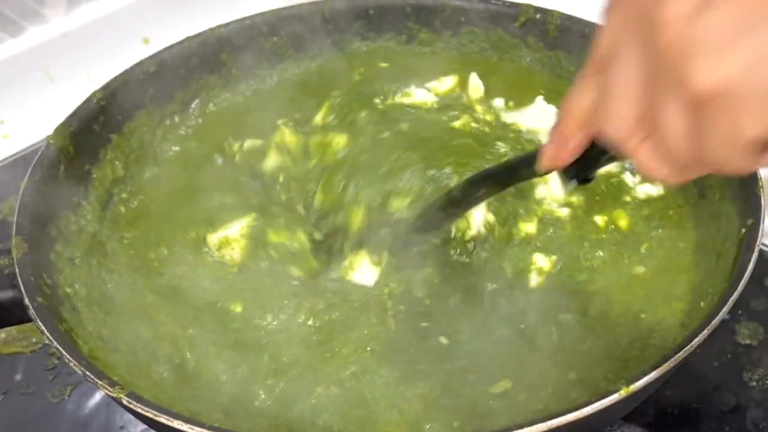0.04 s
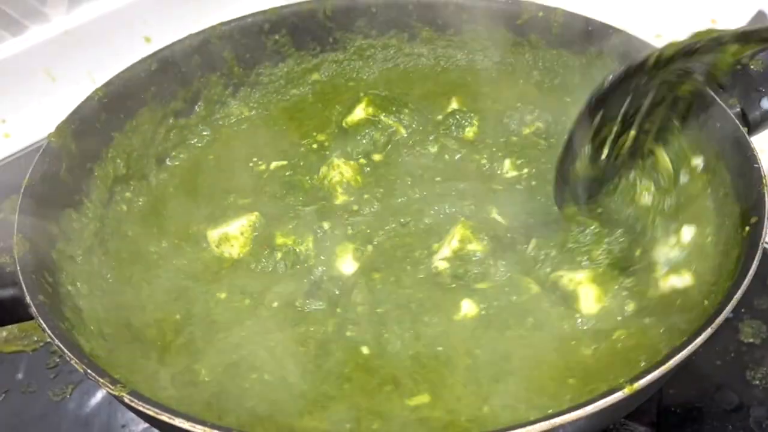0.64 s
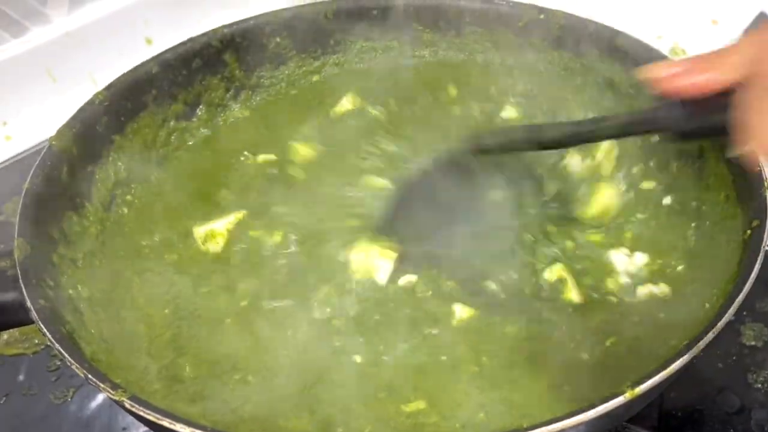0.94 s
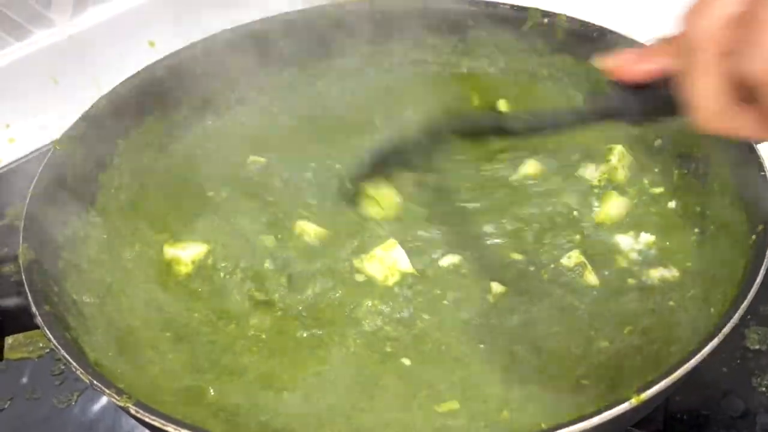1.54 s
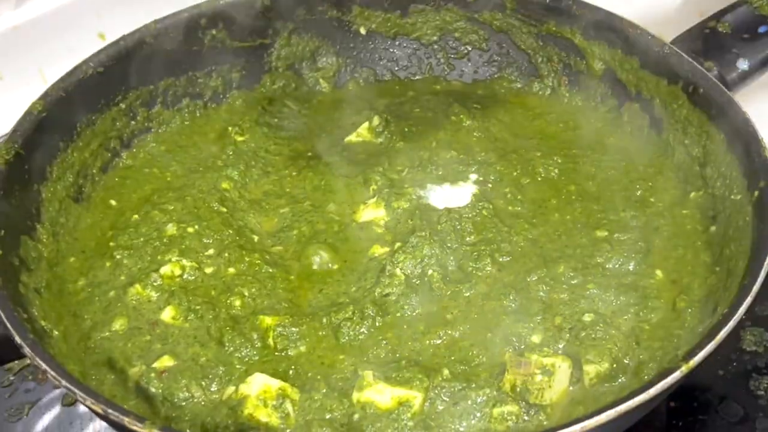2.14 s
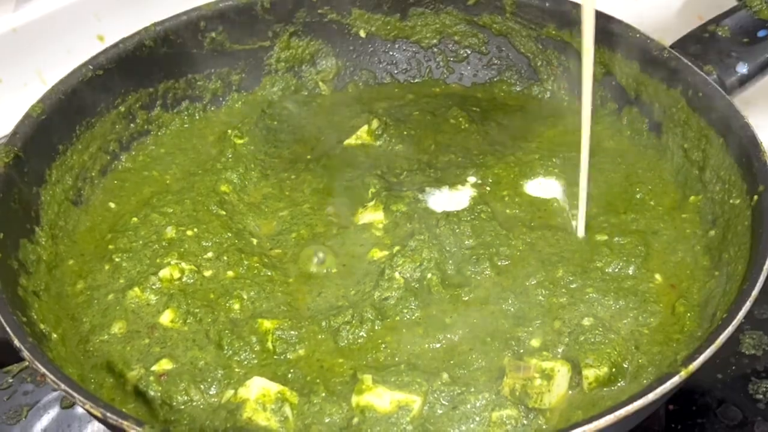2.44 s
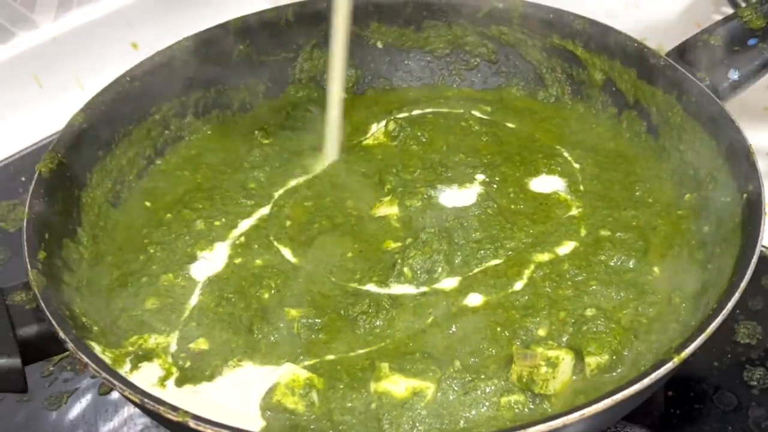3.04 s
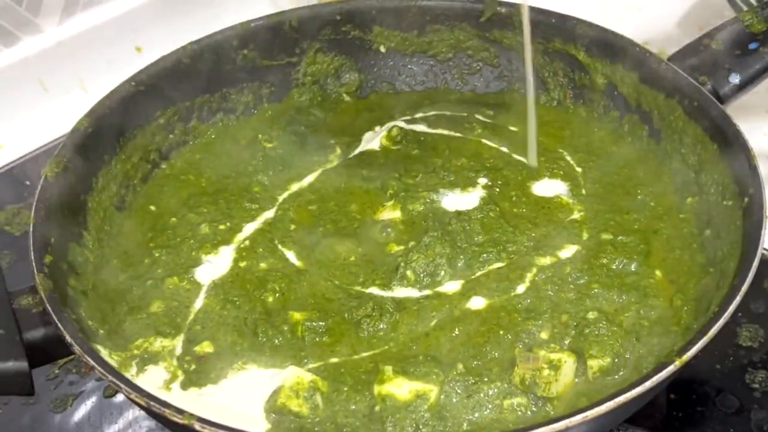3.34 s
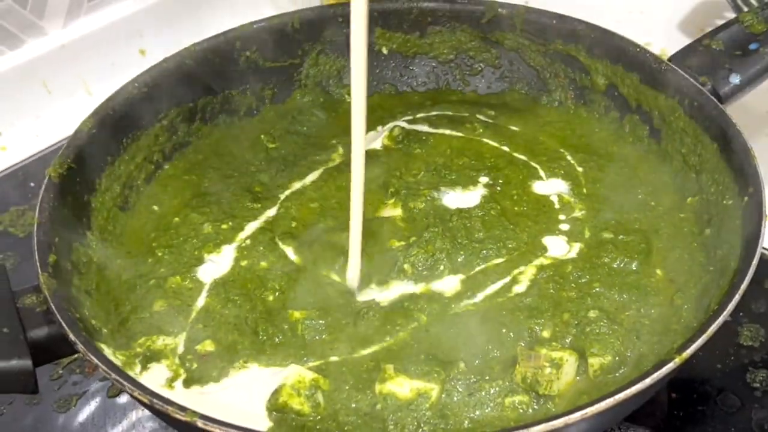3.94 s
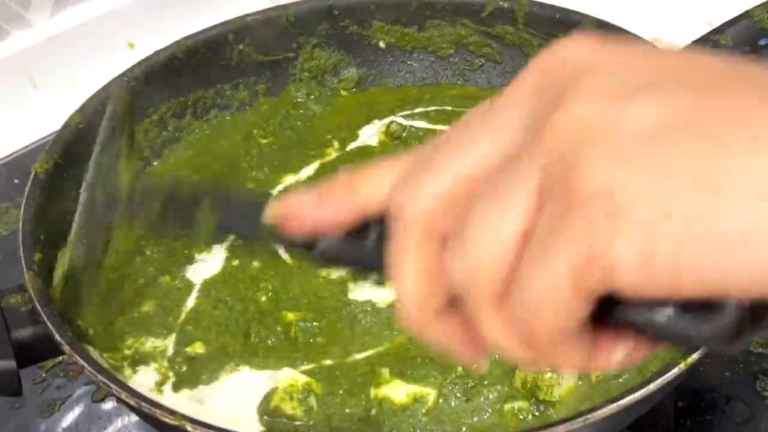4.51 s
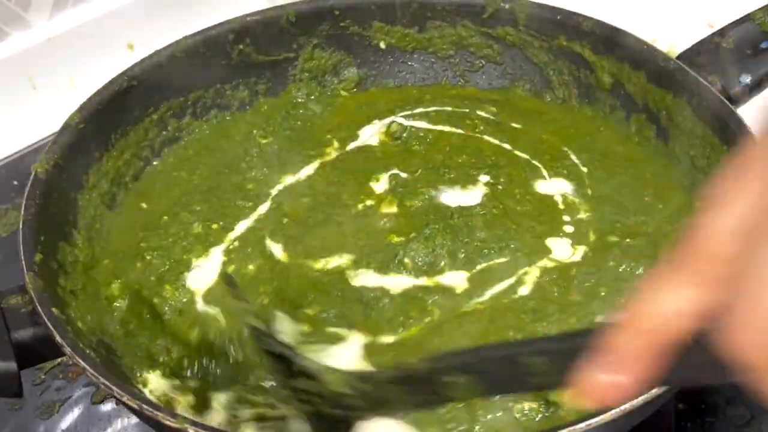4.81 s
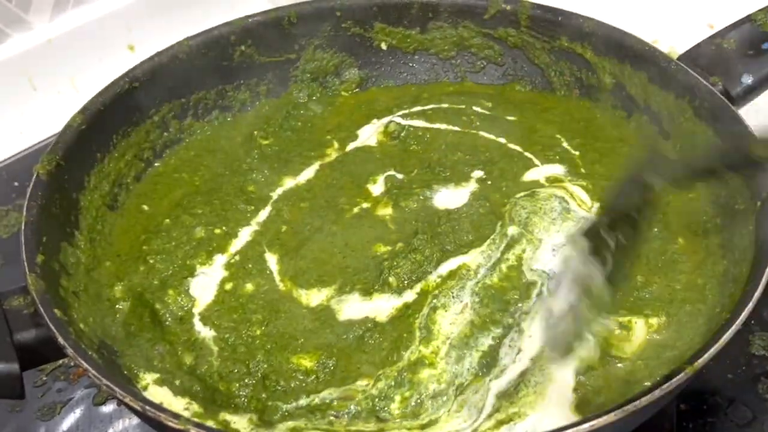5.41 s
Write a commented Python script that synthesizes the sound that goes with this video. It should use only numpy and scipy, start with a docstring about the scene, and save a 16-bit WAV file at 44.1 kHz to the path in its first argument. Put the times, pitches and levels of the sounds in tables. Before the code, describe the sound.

Thick sauce simmers in a frying pan, heard close in stereo in a small kitchen with a short echo and a faint, steady stove and fan hum. For the first 1.4 seconds a plastic spatula stirs, making soft squelches, low glugs and several clacks on the pan, the sharpest at about 1.1 seconds. At 1.7 seconds a light, sputtering sizzle starts abruptly, swells briefly and settles. From there, steam bubbles plop irregularly a few times a second, the sauce sometimes glugging shut, while drops spit with bright ticks on the hot rim, strongest around 2.3, 2.7, 3.2 and 3.9 seconds. From about 4.3 to 4.9 seconds the spatula scrapes wetly round the pan, knocking twice and giving one faint, short, falling squeak near 4.7 seconds. Plops, spits and sizzle continue to the end at about 5.5 seconds.

```python
"""A small, hard-walled kitchen, the stereo microphone close to a frying pan of thick, simmering sauce.
Steam bubbles plop, the sauce glugs shut over them, and drops spit and sizzle on the hot rim.
A plastic spatula clacks and stirs, rests while cream is poured in silently, then scrapes round the pan
again and squeaks once. Stove and fan hum underneath, and the tiles give a short echo."""
import sys
import numpy as np
from scipy import signal
from scipy.fft import rfft, irfft, next_fast_len
from scipy.io import wavfile
from scipy.ndimage import map_coordinates

SR = 44100
rng = np.random.default_rng(int(sys.argv[2]) if len(sys.argv) > 2 else 0)


def wrap_up_sound(samples):
    """Save the sound to the file named by the first command line argument, as 16-bit audio."""
    columns = np.atleast_2d(samples).T
    # keep every value between -1 and 1, then stretch to whole-number steps
    tamed = np.clip(columns, -1, 1)
    steps = np.round(tamed * 32767).astype(np.int16)
    wavfile.write(sys.argv[1], SR, steps)


N = 245407
TIME = np.arange(N) / SR
AGE = np.arange(SR // 5) / SR  # seconds since one short sound began
SIZZLE_START_S = 1.68  # a sizzle switches in abruptly and the seething gets louder


def amp(db):
    """Decibels to gain."""
    return 10 ** (np.asarray(db) / 20)


def unit(x):
    """Scale to rms 1."""
    return x / np.sqrt(np.mean(x ** 2) + 1e-20)


def along(points, hz):
    """Read (Hz, value) points on a log axis."""
    freqs, values = np.transpose(points)
    return np.interp(np.log(hz + 1), np.log(freqs + 1), values)


def after(start, ramp_s=0.0029):
    """A gate that opens at start seconds."""
    return np.clip((TIME - start) / ramp_s, 0, 1)


def wobble(rate):
    """A smooth random curve, rate knots a second."""
    return map_coordinates(rng.standard_normal(int(N * rate / SR) + 4), [TIME * rate])


def add(track, start, sound):
    """Mix a sound in at start seconds."""
    part = track[..., max(round(start * SR), 0):][..., :sound.shape[-1]]
    part += sound[..., :part.shape[-1]]


def filtered(x, response):
    """Filter x by a complex response of frequency."""
    n = x.shape[-1]
    size = next_fast_len(n + 8192, True)
    return irfft(rfft(x, size) * response(np.fft.rfftfreq(size, 1 / SR)), size)[..., :n]


def colour(points, size=2048):
    """Causal impulse response of energy 1 with the given spectral shape."""
    cepstrum = irfft(np.log(amp(along(points, np.fft.rfftfreq(size, 1 / SR)))))
    cepstrum[1:size // 2] *= 2  # fold to minimum phase
    cepstrum[size // 2 + 1:] = 0
    body = irfft(np.exp(rfft(cepstrum)))
    return body / np.linalg.norm(body)


def modes(peaks):
    """Impulse response of energy 1 of a few resonances."""
    body = sum((-1) ** k * amp(db) * width * np.exp(-np.pi * width * AGE) * np.sin(2 * np.pi * hz * AGE)
               for k, (hz, width, db) in enumerate(peaks))
    return body / np.linalg.norm(body)


def burst(body, life_s, scatter):
    """A sharp push and its crumbling aftermath through a body, with the energy of 1 ms at rms 1."""
    crumble = rng.standard_normal(len(AGE)) * np.exp(-AGE / life_s) * np.tanh(AGE / (.25 * life_s))
    force = (AGE == 0) + scatter * crumble / np.linalg.norm(crumble)
    sound = signal.fftconvolve(force, body)[:len(AGE)]
    return sound / np.linalg.norm(sound) * np.sqrt(SR / 1000)


def grains(body, rate, spread_db):
    """Tiny pops of uneven size, about rate a second, through a body; rms 1."""
    size = amp(spread_db * np.minimum(rng.exponential(size=N), 4)) * rng.choice([-1, 1], N)
    pops = size * (rng.random(N) < rate / SR)
    return unit(signal.fftconvolve(pops, body)[:N])


def tone(cycles, flutter, rate=16):
    """A note of rms 1 that follows a running count of cycles, wavering in level and phase."""
    waver = 1 + flutter * (wobble(rate) + 1j * wobble(rate))
    return unit(np.real(waver * np.exp(2j * np.pi * cycles)))


# How alike the room sounds on both sides of the microphone. Each row: frequency in Hz, coherence.
COHERENCE = [(60, .99), (130, .8), (180, .6), (300, .8), (640, .6), (1400, .3), (3000, .45), (6000, .45),
             (8000, .85), (15000, .85)]
def diffuse(pair):
    """Two unrelated signals become left and right, most alike in the bass."""
    def mid_side_gains(hz):
        turn = np.arccos(along(COHERENCE, hz)) / 2
        return np.array([np.cos(turn), np.sin(turn)])
    mid, side = filtered(pair, mid_side_gains)
    return np.array([mid + side, mid - side])


def rush(spectrum):
    """Diffuse stereo noise of rms 1."""
    noise = filtered(rng.standard_normal((2, N)), lambda hz: amp(along(spectrum, hz)))
    return unit(diffuse(noise))


# Fan and stove humming behind the pan. Each row: pitch in Hz, level in dB, flutter from 0 to 1.
STOVE_HUM = [(61, -51, 0.2), (185.1, -62.5, 0.05)]
# Their rush, all round the microphone. Each row: frequency in Hz, relative level in dB.
AIR_SPECTRUM = [(20, -76), (30, -25), (45, -3), (64, -13.5), (100, -3), (140, -12.5), (180, -8.5),
                (230, -17.5), (320, -12.5), (530, -22), (840, -24), (2200, -31), (4500, -38),
                (16000, -55.5)]
def stove(air_db=-53, drone_db=-58, drone_hz=99.6, pour_start_s=1.68, pour_end_s=4.4):
    """Fan and burner hum and rush steadily; a low drone joins them during the pouring."""
    hum = sum(amp(db) * tone(hz * TIME, flutter) for hz, db, flutter in STOVE_HUM)
    pouring = after(pour_start_s) - after(pour_end_s)
    drone = amp(drone_db) * pouring * tone(drone_hz * TIME, flutter=0.94)
    return hum + drone + amp(air_db) * rush(AIR_SPECTRUM)


def bubble(hz, swell_s, rise=0.17):
    """A pocket of steam rings briefly, its pitch rising as the hole opens; thick sauce damps it fast."""
    u = AGE / swell_s
    pitch = hz * (1 + rise * np.tanh(u - 1))
    return (u * np.exp(1 - u)) ** 2 * np.sin(2 * np.pi * np.cumsum(pitch) / SR)


# Big steam bubbles opening close to the microphone. Each row: start in seconds, level in dB,
# pitch at the peak in Hz, swell time in seconds, tearing skin in dB relative to the bubble.
BIG_BUBBLES = [(0.803, -40, 660, 0.0039, 3), (1.767, -43, 710, 0.0028, 2), (2.025, -44, 626, 0.0024, 8),
               (2.24, -38, 610, 0.0034, -2), (2.492, -37, 648, 0.0035, -14), (2.516, -40, 633, 0.0054, -3),
               (2.783, -38.5, 556, 0.0027, -7), (2.918, -36, 598, 0.0037, -10),
               (3.203, -36.5, 600, 0.0035, -19), (3.25, -38.5, 636, 0.003, -13),
               (3.571, -38.5, 560, 0.002, -20), (3.658, -47, 623, 0.0021, -10),
               (4.059, -38, 630, 0.0029, -2), (4.239, -43, 570, 0.0015, -8),
               (4.332, -43.5, 630, 0.0036, 2.5), (4.464, -38, 593, 0.0026, -17),
               (4.595, -41.5, 453, 0.0017, -19), (4.644, -41.5, 360, 0.0026, -24),
               (4.923, -42.5, 530, 0.0025, -11), (4.941, -42.5, 586, 0.0018, -15),
               (5.021, -37.5, 605, 0.0013, -9), (5.189, -38.5, 400, 0.002, -10),
               (5.489, -44, 620, 0.0034, -22)]
# Seething sauce, and its wet squelch, heard close. Each row: frequency in Hz, relative level in dB.
SEETHE_SPECTRUM = [(150, -42.5), (330, -9), (600, -4), (850, -15), (1300, -6), (2500, -24), (5000, -67),
                   (12000, -61)]
SQUELCH_SPECTRUM = [(120, -8), (250, -1.5), (500, 6), (750, -1), (950, -3), (1250, -3), (1480, -1),
                    (1850, -16.5), (6000, -44), (12000, -43)]
def simmer(surge, small_count=70, small_db=-63.5, seethe_db=-67.5, extra_seethe_db=-71):
    """Big plops, each tearing its wet skin, and many small ones over the seething of the sauce."""
    out, wet = np.zeros(N), colour(SQUELCH_SPECTRUM)
    for start, db, hz, swell_s, tear_db in BIG_BUBBLES:
        skin = amp(tear_db) * burst(wet, life_s=0.012, scatter=6.7)
        add(out, start - .001, amp(db) * (bubble(hz, swell_s) + skin))
    for when, pitch, size in rng.random((small_count, 3)):
        plip = bubble(420 * 2 ** (1.3 * pitch), swell_s=0.0022, rise=0.4)
        add(out, when * N / SR, amp(small_db + 3 * size) * plip)
    seethe = grains(colour(SEETHE_SPECTRUM), rate=500, spread_db=4.5)
    return out + (amp(seethe_db) + amp(extra_seethe_db) * surge) * seethe


# Sauce slumping shut in the pan, behind the blade or over a big bubble.
# Each row: start in seconds, level in dB, final pitch in Hz, trim of the wet slap in dB.
SLUMPS = [(0.001, -37.5, 104.5, -1.5), (0.493, -43, 279, 6), (0.883, -45.5, 203, 9), (1.061, -43, 175.5, 8),
          (1.101, -44, 100, 1), (2.783, -44, 198.4, 8.5), (3.191, -49.5, 191, 10), (3.577, -43, 87, -2),
          (4.526, -39, 98.5, 0), (4.8, -41.5, 173.4, 14.5), (4.859, -41, 109, -19), (5.189, -38, 74.5, -5)]
def glugs(pocket_db=-1, first_pitch_ratio=3.596, sink_s=0.00576, swell_s=0.0081):
    """The sauce slaps shut, and the trapped air pocket's pitch sinks as its mouth narrows."""
    out, wet = np.zeros(N), colour(SQUELCH_SPECTRUM)
    envelope = AGE / swell_s * np.exp(1 - AGE / swell_s)
    sink = 1 + (first_pitch_ratio - 1) * np.exp(-AGE / sink_s)
    for start, db, final_hz, slap_db in SLUMPS:
        pocket = amp(pocket_db) * envelope * np.sin(2 * np.pi * np.cumsum(final_hz * sink) / SR)
        slap = amp(slap_db) * burst(wet, life_s=.007, scatter=2.5)
        add(out, start, amp(db) * (pocket + slap))
    return out


# The spatula meeting the pan, close by.
# Each row: start in seconds, level in dB, then trims in dB for the knock and the tick.
BLADE_HITS = [(0.025, -44.5, 8, -0.5), (0.132, -35, -20, -17), (0.1382, -38.5, 1, 6), (0.45, -42, 9, -19),
              (0.4635, -41, 3.5, 4.5), (0.492, -43, 3, 4), (0.801, -44.5, 4, -10), (0.991, -50.5, -10, 7.5),
              (1.0545, -35, 0, -19), (1.0599, -20, -7.5, -14), (1.068, -34, -7, -13),
              (4.508, -36.5, 2, -1.5), (4.8, -45, 15, -20)]
# The pan's ring under the blade. Each row: frequency in Hz, width in Hz, relative level in dB.
PAN_MODES = [(1000, 200, 1), (1900, 300, -12), (2420, 520, -1), (2720, 280, 3.5), (3250, 220, -5)]
# The dull knock, and the tick of the blade's edge. Each row: frequency in Hz, relative level in dB.
KNOCK_SPECTRUM = [(100, -30), (300, -8), (600, 6.5), (1100, -12.5), (1600, 12), (3000, -14), (9000, -110)]
TICK_SPECTRUM = [(1200, -23), (2400, 10.5), (3000, 11.5), (3700, 19.5), (4400, 15), (5300, 8), (6600, -2),
                 (8300, 2.5), (10000, -15.5), (16000, -32)]
def taps(ring_db=-7, knock_db=-6, tick_db=-5):
    """The plastic blade clacks on the pan, which the sauce damps heavily."""
    out, pan = np.zeros(N), modes(PAN_MODES)
    body, edge = colour(KNOCK_SPECTRUM), colour(TICK_SPECTRUM)
    for start, db, knock_trim, tick_trim in BLADE_HITS:
        ring = amp(ring_db) * burst(pan, life_s=.002, scatter=.45)
        knock = amp(knock_db + knock_trim) * burst(body, life_s=0.0015, scatter=0.6)
        tick = amp(tick_db + tick_trim) * burst(edge, life_s=0.00053, scatter=1.0)
        add(out, start + 0.00081, amp(db) * (ring + knock + tick))
    return out


# Drops bursting on hot metal near the microphone.
# Each row: start in seconds, level in dB, then trims in dB for the snap, the ping and the spray.
DROPS = [(0.1386, -38, -23, -8, -27), (0.179, -52, -18, -1, -22), (1.686, -49, 10.5, 11.5, -27),
         (1.705, -42.5, 3.5, -9, -31), (1.716, -42, 4, -12, -29), (1.734, -48, 11, -12, -23),
         (1.741, -55, 7, -12, -23), (1.786, -46.5, 10.5, -16, -1), (1.855, -37, -3, 5, -5.5),
         (1.867, -42, -4, -12, -20), (1.959, -36.5, -11, -12, -24), (1.978, -46, -6, -8, -17),
         (2.006, -35, -4, 1, -17), (2.036, -33, -3, -4, -11), (2.045, -40, -3, -12, -25),
         (2.231, -44.5, 3, 7.5, -8.5), (2.297, -40, -23, -1, -27), (2.313, -17.5, -14.5, 0, -26.5),
         (2.446, -45, -15, 3.5, -23), (2.486, -27, -2, -4, -14), (2.6371, -28, -23, -9, -21),
         (2.6675, -22, -15.5, -23, -15.5), (2.813, -54, 12.5, -15, -18), (2.957, -43.5, -2, -10, -12.5),
         (3.117, -35.5, -5, -16, -4.5), (3.1898, -18, -3, -20, -28), (3.2529, -31.5, -6, -20, -13.5),
         (3.329, -45, -6, -12, -10), (3.413, -35, -17, -13, -9.5), (3.553, -45.5, -0.5, 2, -10),
         (3.8335, -29, -36, -14, -42), (3.8603, -27, -25, -9, -19), (3.862, -21, -23, -5.5, -30),
         (3.886, -38, 3, -17, -22), (4.102, -32, -10, -4, -17), (4.1409, -27, -11, -8, -40),
         (4.2865, -44.5, -12, -6, -3), (4.3513, -41, -16, -8, -8.5), (4.458, -33.5, -27, -7, -18),
         (4.79, -33, -10, -3, -25), (4.938, -30.5, -3.5, 0, -16), (5.04, -45.5, -20, 8.5, -6),
         (5.467, -42.5, -6, -14, -2)]
# A drop's bright crack, lower snap and frying spray. Each row: frequency in Hz, relative level in dB.
CRACK_SPECTRUM = [(1500, -30), (4500, 4), (6200, 18.5), (7400, 1), (8600, 16.5), (11000, 21.5), (12500, 8),
                  (14800, 19), (17000, -21)]
SNAP_SPECTRUM = [(150, -35), (450, 14), (1000, 14.5), (1700, 8), (2600, 10.5), (3400, 12), (4300, 5.5),
                 (5200, 3.5), (6200, 7), (9000, -8), (16000, -5)]
FRY_SPECTRUM = [(500, 5.5), (1200, -5), (2500, -10.5), (5000, 0.5), (7000, 0), (8700, 2), (11000, -0.5),
                (13000, -13), (15700, -0.5), (17000, -55)]
def spits(crack_db=-9.5, snap_db=-5, spray_db=7, ping_hz=8300):
    """Each drop cracks open, its tiny cavity rings for a few cycles, then its spray fries away."""
    out = np.zeros(N)
    bright, low, fry = colour(CRACK_SPECTRUM), colour(SNAP_SPECTRUM), colour(FRY_SPECTRUM)
    detunes = 1.04 ** rng.uniform(-1, 1, len(DROPS))
    for (start, db, snap_trim, ping_trim, spray_trim), detune in zip(DROPS, detunes):
        crack = amp(crack_db) * burst(bright, life_s=.0008, scatter=.45)
        snap = amp(snap_db + snap_trim) * burst(low, life_s=.0012, scatter=.7)
        spray = amp(spray_db + spray_trim) * burst(fry, life_s=0.022, scatter=0.6)
        ping = amp(ping_trim) * bubble(ping_hz * detune, swell_s=.0002, rise=.25)
        add(out, start + .0007, amp(db) * (crack + snap + spray))
        add(out, start + .0003, amp(db) * ping)
    return out


# The spatula working round the pan, close by. Each row: start and length in seconds,
# then levels in dB for slosh, squelch, suck and scrape.
STIRS = [(0.446, 0.037, -77, -72, -60, -53.5), (0.818, 0.059, -67, -57, -55.5, -65.5),
         (0.88, 0.13, -57.5, -64, -64, -83), (1.182, 0.24, -56.5, -78, -76, -91),
         (4.339, 0.09, -81, -68, -59, -56), (4.47, 0.16, -63, -70, -70, -63),
         (4.59, .1, -70, -66, -78, -56), (4.624, .115, -81, -71, -60, -51.5),
         (4.69, 0.11, -63, -58, -52.5, -61), (4.795, .11, -54, -58, -60, -64)]
# Thick sauce pushed aside. Each row: frequency in Hz, relative level in dB.
SLOSH_SPECTRUM = [(150, -4), (300, -14.5), (500, -1), (750, -21), (1300, -24), (3000, -32), (12000, -59)]
# Air sucked in behind the blade. Each row: pitch in Hz, swell time in seconds, relative level in dB.
AIR_POCKETS = [(675, 0.0017, -5.5), (1143, 0.0029, -1), (1410, 0.0022, -1)]
# The blade ringing on the pan floor. Each row: frequency in Hz, width in Hz, relative level in dB.
BLADE_MODES = [(1130, 130, 0), (2260, 200, 2.5), (2950, 340, 1), (3450, 380, 0), (6150, 1700, -6)]
def strokes(scrape_trim_db=-1, press_share=0.44, pitch_sag=.08):
    """The blade pushes sauce aside, drags wetly through it and rasps on the pan, sinking in pitch."""
    slosh = grains(colour(SLOSH_SPECTRUM), rate=400, spread_db=3)
    squelch = grains(colour(SQUELCH_SPECTRUM), rate=500, spread_db=3.5)
    suck = unit(sum(amp(db) * grains(bubble(hz, swell_s), rate=110, spread_db=2.5)
                    for hz, swell_s, db in AIR_POCKETS))
    scrape = amp(scrape_trim_db) * grains(modes(BLADE_MODES), rate=420, spread_db=3)
    out, layers = np.zeros(N), np.array([slosh, squelch, suck, scrape])
    for start, length, *levels_db in STIRS:
        progress = np.linspace(0, 1, int(length * SR))
        pressure = np.sin(np.pi / 2 * np.interp(progress, [0, press_share, 1], [0, 1, 0]))
        travel = start * SR + np.cumsum(1 - pitch_sag * (progress - .5))  # slowing lowers the pitch
        add(out, start, pressure * map_coordinates(amp(levels_db) @ layers, [travel]))
    return out


def sizzle_surge(swell_db=9, swell_at_s=1.754, half_width_s=0.13):
    """Gain of the sizzle and extra seething: it switches in abruptly, swells briefly and settles at 1."""
    swell = np.exp(-((TIME - swell_at_s) / half_width_s) ** 2)
    return after(SIZZLE_START_S) * amp(swell_db * swell)


def sizzle(surge, hiss_db=-63, sputter_db=1.6, droplet_db=-52, droplet_count=12):
    """Water steams off the rim: a sputtering hiss, tiny crackles and the odd droplet frying away."""
    droplets, fry = np.zeros(N), colour(FRY_SPECTRUM)
    for when, size in rng.random((droplet_count, 2)):
        start = SIZZLE_START_S + when * (N / SR - SIZZLE_START_S)
        add(droplets, start, amp(droplet_db + 5 * size) * burst(fry, life_s=0.045, scatter=3.3))
    crackle = amp(-9) * grains(fry, rate=90, spread_db=5)
    sputter = amp(sputter_db * wobble(rate=26))
    return droplets + amp(hiss_db) * surge * sputter * (rush(FRY_SPECTRUM) + crackle)


# One squeak from the pan floor: start and length in seconds, level in dB, first and last pitch in Hz.
BLADE_SQUEAK = (4.632, .1, -55.5, 2390, 2190)
def squeak():
    """At its hardest push the blade sticks and slips on the pan floor: a short, rough note that sinks."""
    start, length, db, first_hz, last_hz = BLADE_SQUEAK
    progress = np.clip((TIME - start) / length, 0, 1)
    pitch = first_hz + (last_hz - first_hz) * progress
    envelope = np.sin(np.pi * progress ** .75) ** 2
    return amp(db) * envelope * tone(np.cumsum(pitch) / SR, flutter=.6, rate=190)


# The kitchen's echo at the microphone. Each row: frequency in Hz, seconds to fall by 60 dB.
KITCHEN_DECAY = [(150, 0.035), (700, 0.3), (3000, 0.28), (8000, 0.21), (15000, 0.013)]
def in_kitchen(sources, echo_db, gap_s=0.0028, early_db=9.5, early_s=0.0012):
    """Close sounds and their echo: hob and pan wall answer first, then tiles and walls."""
    send, echo = amp(echo_db) @ np.array(sources), np.zeros((2, N))
    for part in np.array_split(np.arange(N), 12):  # the tail differs from moment to moment
        hz, age, noise = signal.stft(rng.standard_normal((2, SR // 3)), SR, nperseg=256)
        decay = amp(-60 * age / along(KITCHEN_DECAY, hz)[:, None])
        tail = signal.istft(noise * decay, SR, nperseg=256)[1]
        early = amp(early_db) * np.exp(-np.arange(tail.shape[1]) / SR / early_s)
        tail = diffuse(tail * (1 + early))
        tail /= np.linalg.norm(tail[0])
        add(echo, part[0] / SR + gap_s, signal.fftconvolve(send[None, part], tail, axes=1))
    return sum(sources) + echo


# The microphone's balance. Each row: frequency in Hz, left minus right in dB.
MIC_BALANCE = [(60, .9), (130, 2.5), (300, .3), (1200, 2.2), (2400, .7), (4500, 1.8), (8000, -.8),
               (15000, 0)]
def microphone(x, phases):
    """The left and right ports differ in level and phase, by frequency."""
    half = np.array([[.5], [-.5]])
    def response(hz):
        phase = np.interp(hz, *np.transpose(phases))
        return amp(half * along(MIC_BALANCE, hz)) * np.exp(1j * half * phase)
    return filtered(x, response)


# How the pan reaches the microphone, and the spatula, which works from another side.
# Each row: frequency in Hz, phase between the ports in radians.
PAN_PHASES = [(0, 0), (500, .2), (1000, 1.35), (1500, 3.2), (2500, 2 * np.pi), (3100, 7.7), (3900, 8.2),
              (4400, 10.4), (6000, 14.7), (7200, 14.5), (16800, -1.7)]
SPATULA_PHASES = [(0, 0), (700, .3), (1300, .7), (1600, 3.2), (2400, 2 * np.pi), (2900, 7.3), (4500, 7.2),
                  (6000, 6.7), (16800, 4.5)]
def scene():
    """Sauce and spatula close by, the stove underneath; seething and sizzle swell together."""
    surge = sizzle_surge()
    sauce = in_kitchen([simmer(surge), glugs(), spits()], echo_db=[-4, -5, -3.5])
    spatula = in_kitchen([taps(), strokes() + squeak()], echo_db=[-6, -2])
    hob = stove() + sauce + sizzle(surge)
    return microphone(hob, PAN_PHASES) + microphone(spatula, SPATULA_PHASES)


def record(dry, top_hz=16700):
    """The recorder cuts off steeply at its band limit."""
    return filtered(dry, lambda hz: 1 / (1 + (hz / top_hz) ** 120))


dry = scene()
out = record(dry)
wrap_up_sound(out)
```